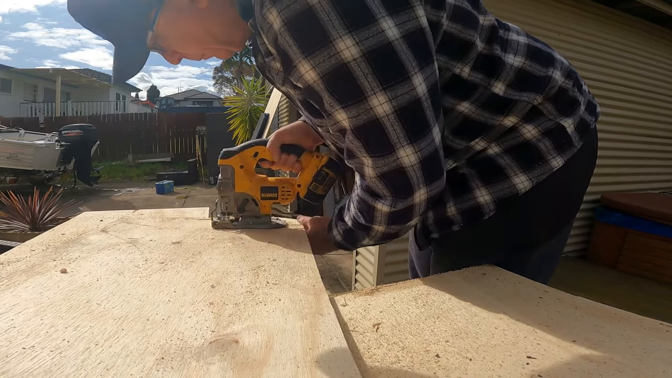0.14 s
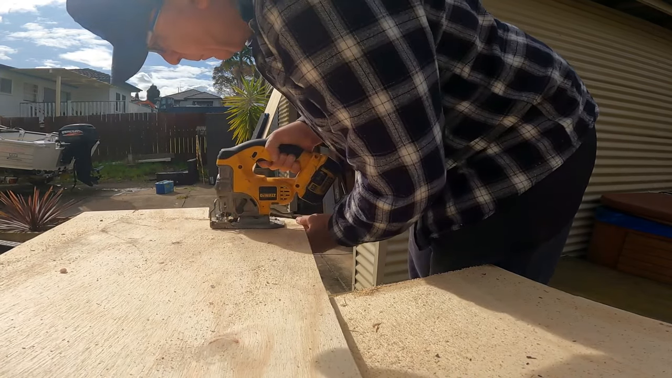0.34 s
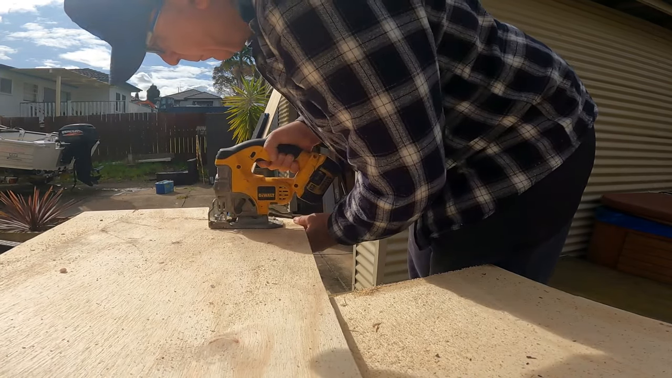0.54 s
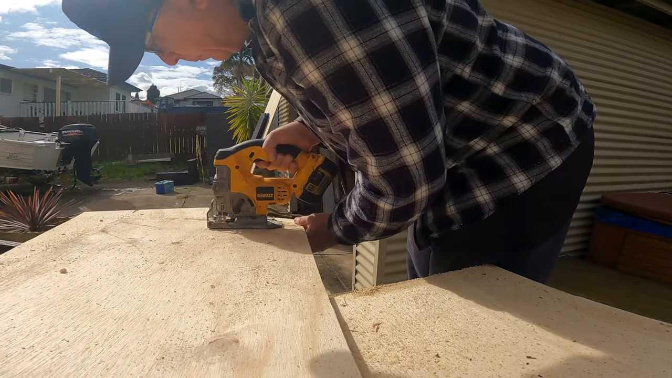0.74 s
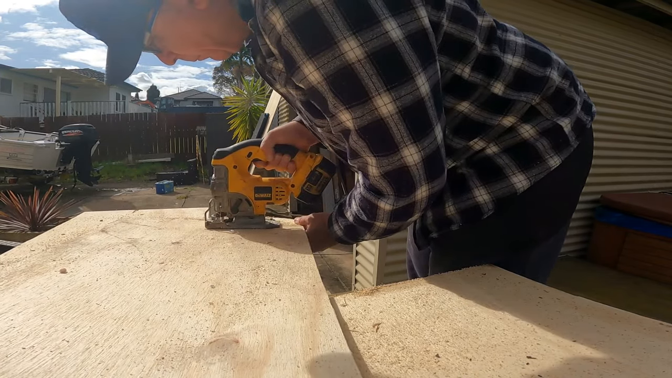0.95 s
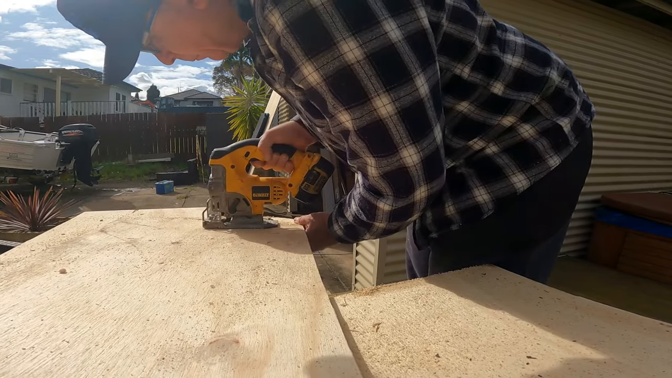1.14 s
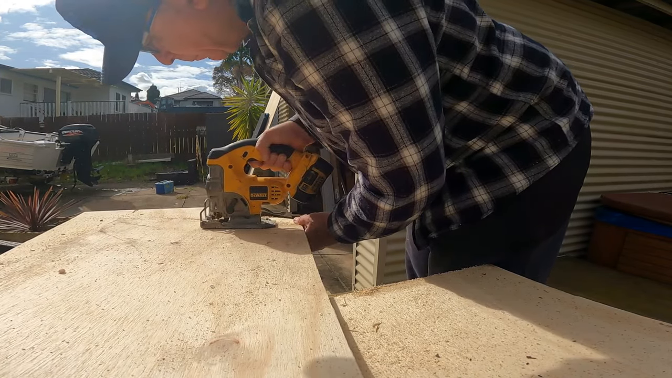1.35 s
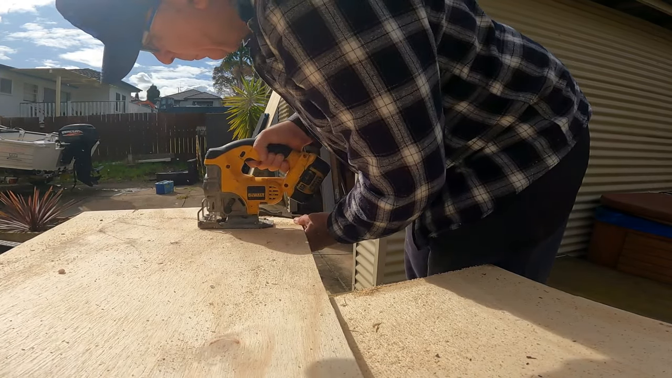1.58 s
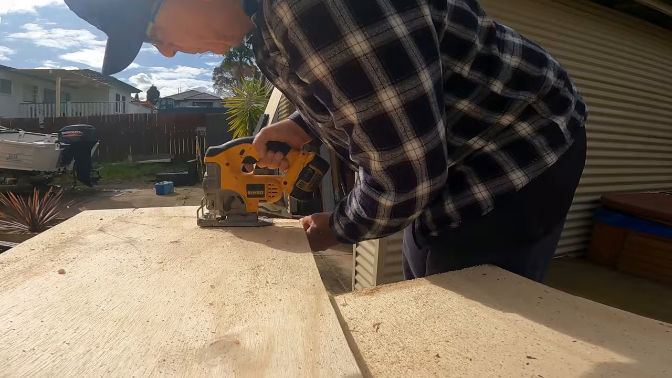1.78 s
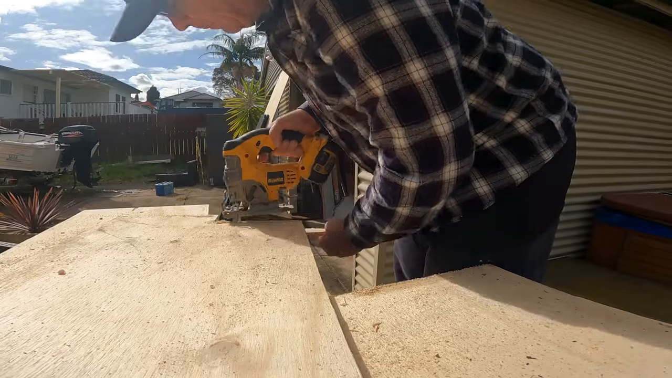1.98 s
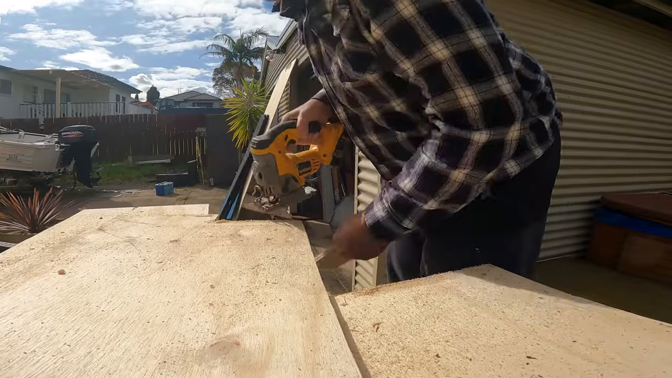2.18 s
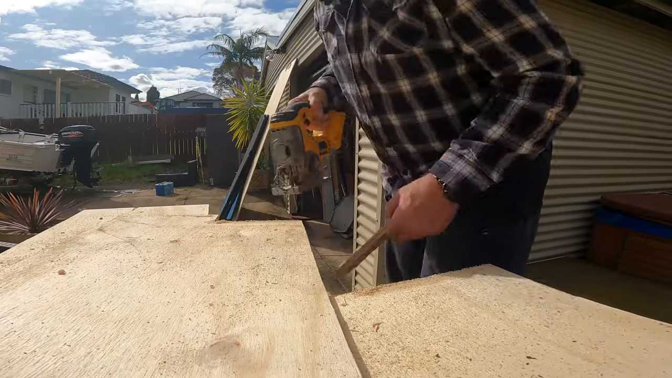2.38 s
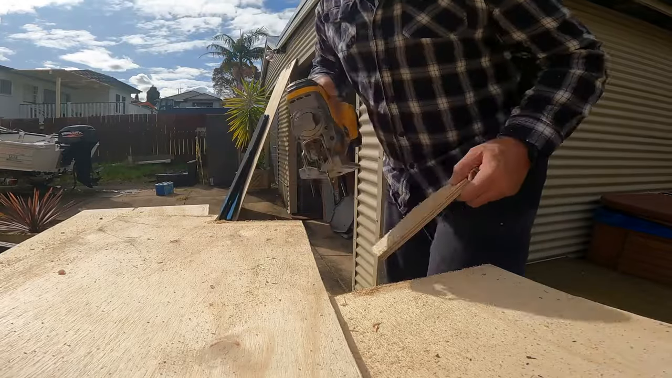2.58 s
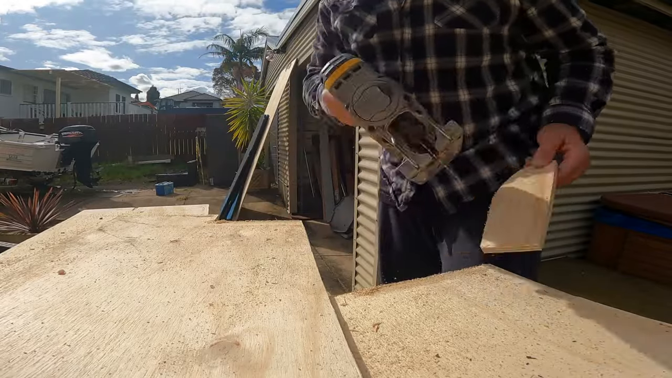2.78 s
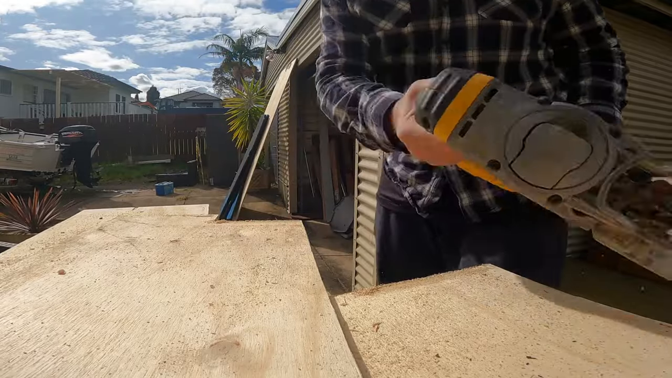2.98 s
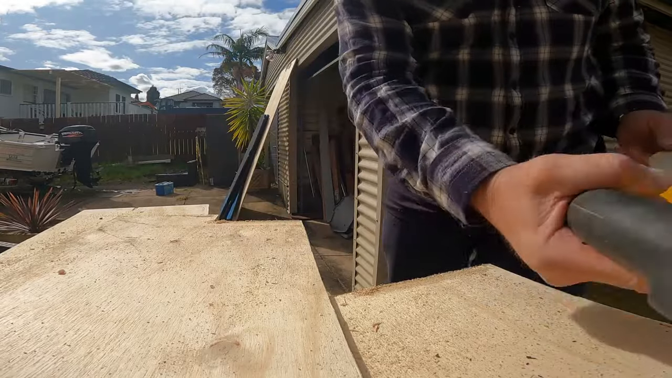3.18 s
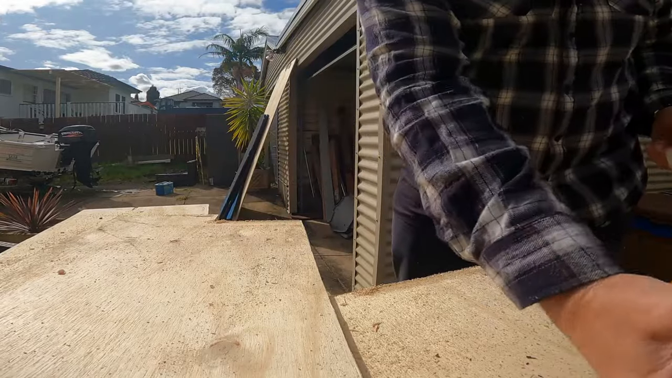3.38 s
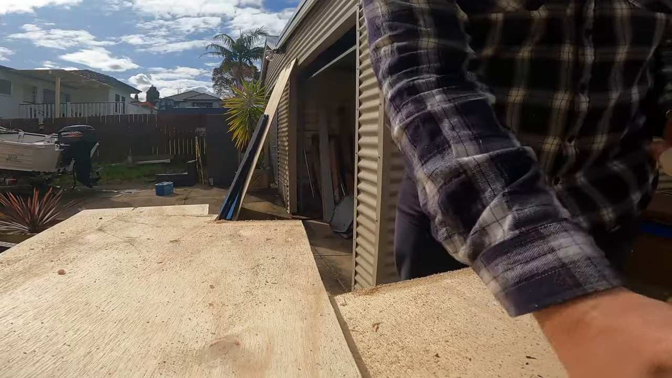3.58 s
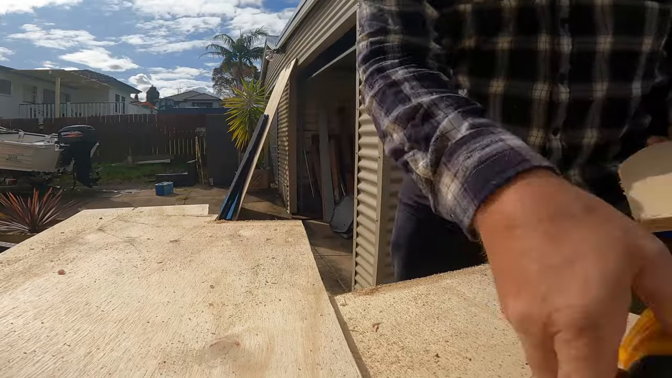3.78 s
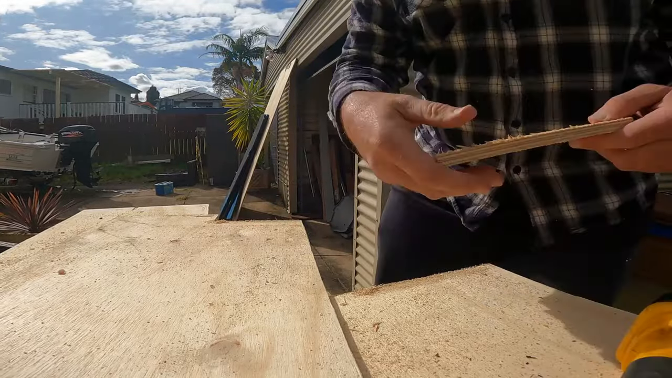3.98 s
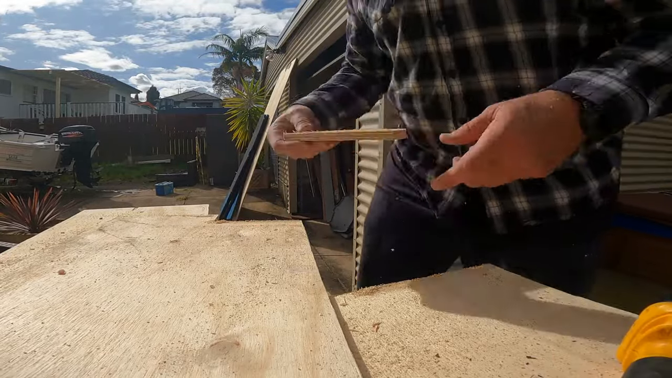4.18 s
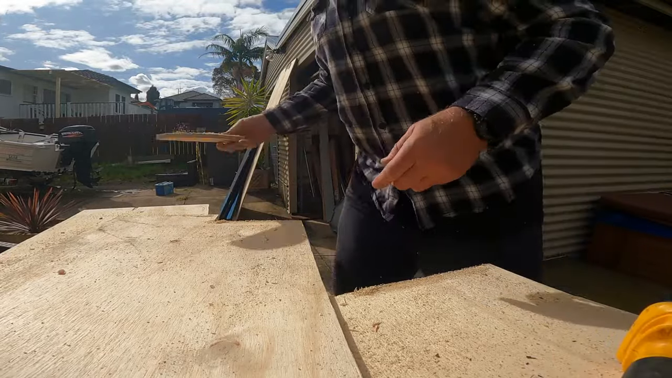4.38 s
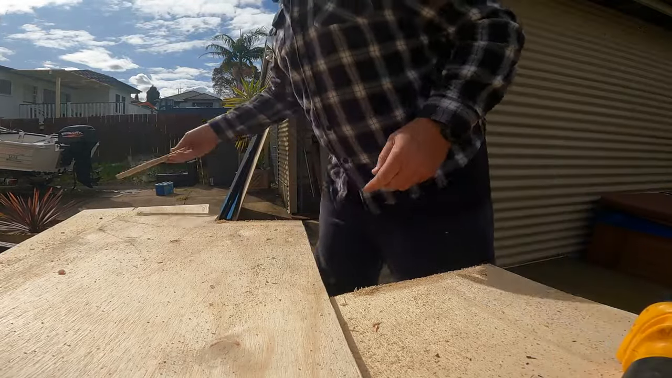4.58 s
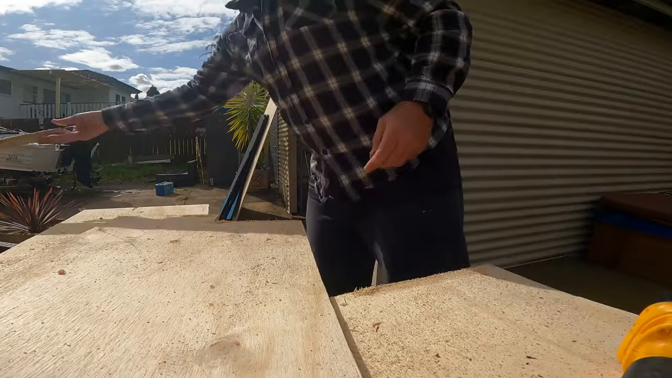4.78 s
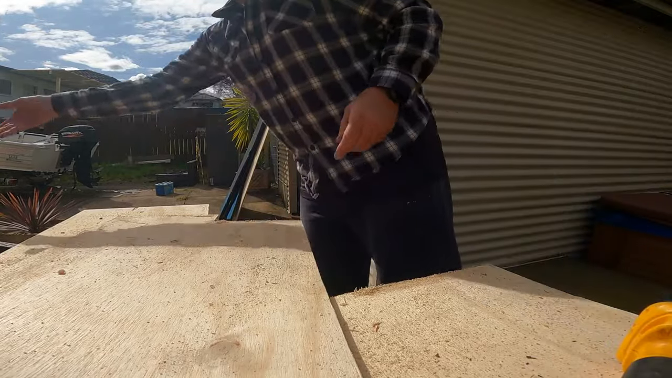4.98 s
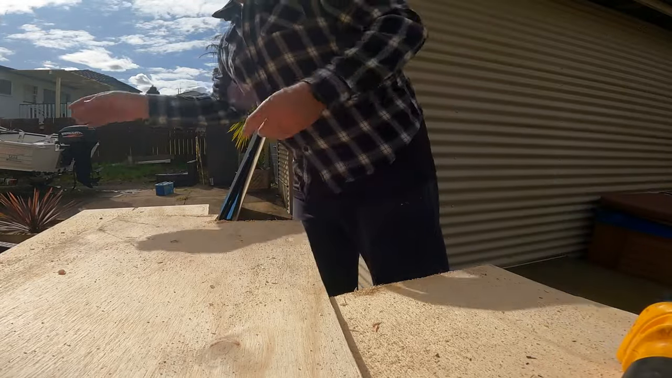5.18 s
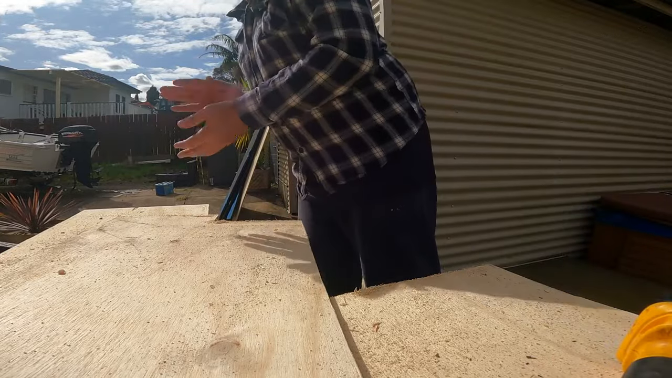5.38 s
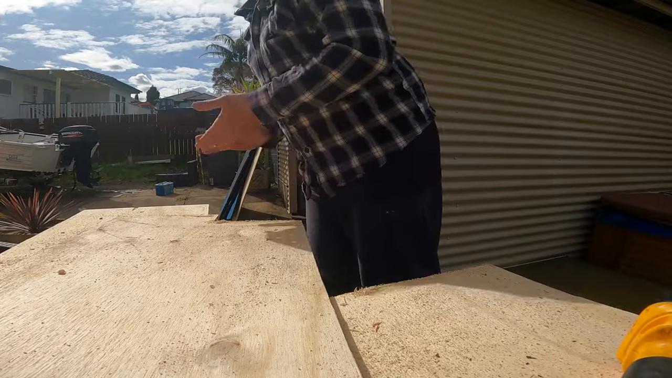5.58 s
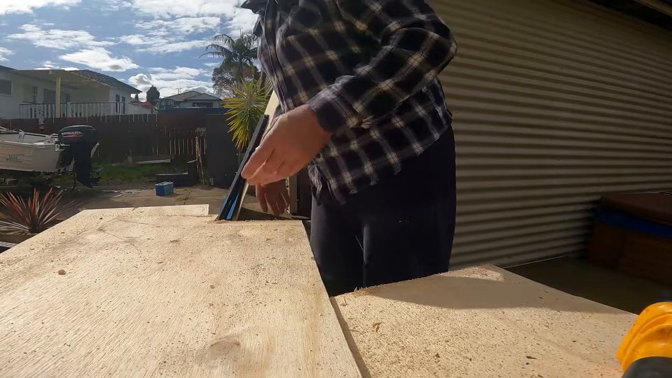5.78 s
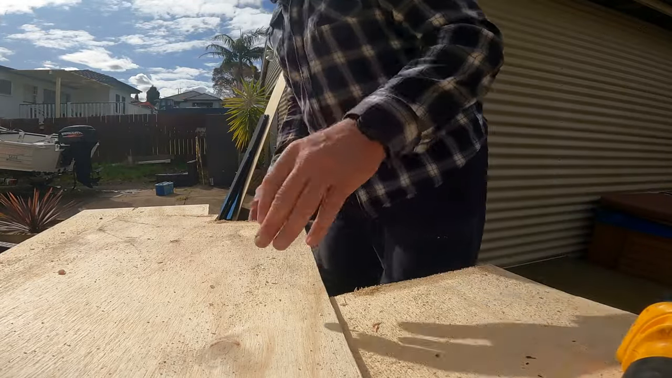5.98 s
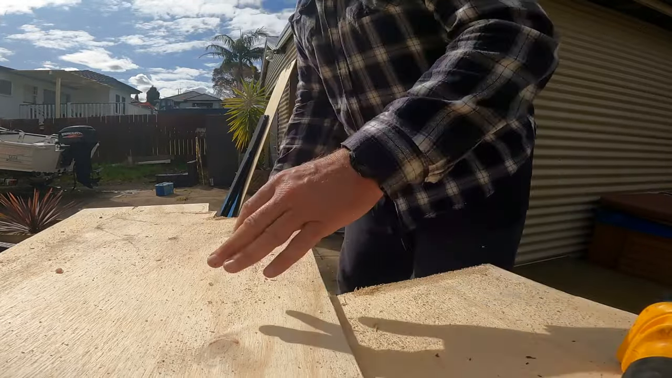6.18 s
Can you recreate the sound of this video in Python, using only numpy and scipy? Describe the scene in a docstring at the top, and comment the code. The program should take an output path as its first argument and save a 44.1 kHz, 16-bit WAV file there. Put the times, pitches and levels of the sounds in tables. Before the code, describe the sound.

An electric jigsaw cuts wood and brakes, followed by deep knocks, sleeve rustle and a tossed scrap of wood landing in a yard.

```python
"""A jigsaw rasps through a plywood sheet, about 46 strokes a second, and brakes to a halt.
The saw is put down on the sheet and rocks, and the offcut is tossed onto a pile. Hands and sleeves
rustle, two birds call far off and distant traffic hums in a yard with a short echo from a tin shed.
The microphone stands on the sheet, so knocks reach it as deep thuds."""
import sys
import numpy as np
from scipy import signal
from scipy.fft import rfft, irfft, next_fast_len
from scipy.io import wavfile
from scipy.ndimage import map_coordinates

SR = 44100
rng = np.random.default_rng(int(sys.argv[2]) if len(sys.argv) > 2 else 0)


def master(y):
    """Save y as 16-bit WAV."""
    cut = np.clip(np.atleast_2d(y).T, -1, 1)
    pcm = np.round(cut * 32767)  # scale
    wavfile.write(sys.argv[1], SR, pcm.astype(np.int16))


N = 275625
T = np.arange(N) / SR
OUT_S, BRAKE_S = 1.845, 1.9135  # the blade leaves the wood, then the brake bites
COAST_DB_PER_S = 44  # how fast motor and shaking fade once the blade is out
# The crack of hard edges meeting. Each row: pitch in Hz, width in Hz, level in dB.
CRACK_PEAKS = [(2160, 1000, 1), (4900, 1400, -3.5), (6900, 1400, -10)]


def amp(db):
    """Turn decibels into a number to multiply by."""
    return 10 ** (np.asarray(db) / 20)


def unit(x):
    """Scale a sound to an average (rms) strength of 1."""
    return x / np.sqrt(np.mean(x ** 2) + 1e-20)


def after(s):
    """Seconds gone since time s, or 0 before it."""
    return np.clip(T - s, 0, None)


def over_time(points):
    """Join (seconds, value) points into one value per sample."""
    return np.interp(T, *np.transpose(points))


def along(points, hz):
    """Read between (Hz, value) points on a logarithmic pitch scale."""
    pitches, values = np.transpose(points)
    return np.interp(np.log(hz + 1), np.log(pitches + 1), values)


def wobble(rate):
    """A random curve that heads for a new value rate times a second."""
    return map_coordinates(rng.standard_normal(int(N * rate / SR) + 4), [T * rate], order=1)


def grainy(depth_db, rate):
    """Noise whose strength flickers."""
    return rng.standard_normal(N) * amp(depth_db * wobble(rate))


def filtered(x, response):
    """Multiply each frequency in x by response(hz)."""
    size = next_fast_len(N + SR // 2)
    return irfft(rfft(x, size) * response(np.fft.rfftfreq(size, 1 / SR)), size)[..., :N]


def coloured(x, spectrum):
    """Shape noise with (Hz, dB) points and scale it to strength 1."""
    return unit(filtered(x, lambda hz: amp(along(spectrum, hz))))


def resonances(x, peaks, soft_hz=20000):
    """Let x ring a body with (Hz, width in Hz, dB) peaks; treble above soft_hz is dulled."""
    hz = np.fft.rfftfreq(SR // 4, 1 / SR)
    modes = sum((-1) ** k * amp(db) * 1j * hz * width / (pitch ** 2 - hz ** 2 + 1j * hz * width)
                for k, (pitch, width, db) in enumerate(peaks))
    body = irfft(modes / (1 + 1j * hz / soft_hz) ** 2)
    return signal.fftconvolve(x, body / np.abs(body).max())[:N]


def struck(times, levels_db, peaks, rattle, t60, soft_hz):
    """Each contact rings a body with one push and a rattle that fades by 60 dB in t60 seconds."""
    push, t = np.zeros(N + SR // 4), np.arange(SR // 4) / SR
    for s, db in zip(times, levels_db):
        blow = rattle * amp(-60 * t / t60) * rng.standard_normal(len(t))
        blow[0] = -1
        push[round(s * SR):][:len(t)] += amp(db) * blow
    return resonances(push, peaks, soft_hz)  # a soft contact stirs little treble


def yard():
    """Distant traffic and air make a low noise, a little different in each ear; from about 3 s the background
    slowly grows louder."""
    spectrum = [(18, -29.5), (30, -4.5), (92, -6.5), (200, -1), (550, -17.5), (1300, -18.5), (1910, -24),
                (3000, -29.5), (6650, -31.5), (14900, -58)]  # Each row: pitch in Hz, level in dB.
    swell = [(0, -63), (2.85, -64.5), (3.2, -61), (6.25, -52)]  # Each row: time in seconds, level in dB.
    middle, side = amp(over_time(swell)) * coloured(rng.standard_normal((2, N)), spectrum)
    return middle + np.outer([1, -1], 0.4 * side)


def shed_echo(x):
    """Shed and fences throw the sound back; the treble dies first and the two ears hear it differently."""
    fade_times = [(200, 0.38), (2000, 0.36), (10000, 0.099)]  # Each row: pitch in Hz, seconds to fade by 60 dB.
    side_levels = [(60, -22), (700, -22), (2300, -18), (4300, -12), (14000, -5.5)]  # Each row: pitch in Hz, level in dB of the left-right difference.
    hz, t, noise = signal.stft(rng.standard_normal((2, SR // 2)), SR, nperseg=256)
    tail = signal.istft(noise * amp(-60 * t / along(fade_times, hz)[:, None]), SR, nperseg=256)[1]
    delayed = np.pad(x, (300, 0))[None]
    side, middle = signal.fftconvolve(delayed, tail / np.linalg.norm(tail[0]), axes=1)[:, :N]
    side = filtered(side, lambda hz: amp(along(side_levels, hz)))
    return amp(-18.5) * middle + np.outer([1, -1], side)


def bird_call(s, length, db, pitch):
    """One fluttering tone swells and fades; pitch(t) gives its Hz at t seconds into the call."""
    t = np.arange(0, length, 1 / SR)
    flutter = amp(db + 2.5 * wobble(69)[:len(t)])
    swell = np.sin(np.pi * (t / length) ** 0.6)
    tone = flutter * swell * np.sin(2 * np.pi * np.cumsum(pitch(t)) / SR)
    return np.pad(tone, (round(s * SR), N))[:N]


def birds():
    """One bird slides up into clear whistles; the other rasps, its pitch shaken too fast to follow."""
    # Each row: start, length and slide time in seconds, top pitch in Hz, level in dB.
    whistles = [(2.093, 0.25, 0.08, 3130, -67.5), (2.311, .24, 0.083, 3130, -68.5),
                (3.192, 0.23, 0.068, 3170, -65), (3.424, 0.18, .03, 3040, -56)]
    # Each row: start and length in seconds, pitch and its spread in Hz, level in dB.
    rasps = [(2.307, 0.38, 2440, 330, -67.5), (3.072, 0.34, 2140, 242, -66), (3.325, 0.38, 2204, 277, -59),
             (5.733, 0.94, 2600, 186, -60)]
    waver, shaken = 1 + 0.008 * wobble(110), wobble(600)
    song = np.zeros(N)
    for s, length, slide, top, db in whistles:
        glide = lambda t: np.interp(t, [0, slide, slide + .06], [top - 300, top, top - 120])
        song += bird_call(s, length, db, lambda t: glide(t) * waver[round(s * SR):][:len(t)])
    for s, length, hz, spread, db in rasps:
        song += bird_call(s, length, db, lambda t: hz + spread * shaken[:len(t)])
    return song


def handling():
    """Sleeves and hands brush past: cloth rustles and wood slides on wood."""
    moves = [(2.579, 0.044, -71, -65), (2.925, 0.13, -62.5, -54), (3.042, 0.073, -64.5, -72),
             (3.498, 0.14, -60, -49.5), (3.631, 0.15, -58.5, -48.5), (3.731, 0.2, -54, -43),
             (4.19, 0.059, -65.5, -73), (4.441, 0.063, -60.5, -78), (4.455, 0.65, -67, -63.5),
             (4.622, 0.065, -66, -65), (4.749, 0.055, -57, -56.5), (4.805, 0.43, -63, -51),
             (5.253, 0.18, -50.5, -47), (5.549, 0.17, -51.5, -57.5), (5.908, 0.083, -60.5, -55.5),
             (6.114, 0.22, -55, -47)]  # Each row: start and rough length in seconds, cloth and scrape levels in dB.
    cloth_spectrum = [(880, -21), (1500, -36), (2540, -4), (6770, -5.5), (12400, -26.5), (14900, -33)]  # Each row: pitch in Hz, level in dB.
    scrape_spectrum = [(100, 0.5), (300, -2.5), (800, -15.5), (1400, -5.5), (1800, -13), (3000, -15.5),
                       (5000, -42)]  # Each row: pitch in Hz, level in dB.
    strength = np.zeros((2, N + SR))
    for s, length, *levels_db in moves:
        done = np.arange(0, 1.4, 1 / (length * SR))
        shape = np.clip(np.minimum(done / 0.1, (1.4 - done) / 0.76), 0, 1) ** 2  # quick start, slow fade
        strength[:, round(s * SR):][:, :len(done)] += np.outer(amp(levels_db), shape)
    cloth = coloured(grainy(2.0, rate=150), cloth_spectrum) * amp(2.8 * wobble(25))
    scrape = coloured(grainy(2.4, rate=51), scrape_spectrum) * amp(1.3 * wobble(25))
    return strength[0, :N] * cloth + strength[1, :N] * scrape


def sway():
    """Each push sets the sheet swaying on its trestles with a deep rumble that dies away."""
    pushes = [(1.93, -36.5), (3.0, -56), (3.469, -19.5), (3.8, -21.5), (4.02, -30.5), (4.209, -40.5),
              (4.42, -45), (4.85, -48), (5.249, -25), (5.91, -34.5), (6.17, -32)]  # Each row: start in seconds, level in dB.
    rise_s, t60 = 0.024, 0.84
    kicks, t = np.zeros(N), np.arange(SR) / SR
    s, db = np.transpose(pushes)
    kicks[np.round(s * SR).astype(int)] = amp(db)
    swing = signal.fftconvolve(kicks, amp(-60 * t / t60) * (1 - np.exp(-t / rise_s)))[:N]
    return swing * coloured(rng.standard_normal(N), [(15, -9), (30, 14), (55, 8), (90, -6), (200, -65)])


def pats():
    """A palm lands on the wood with a light slap; being soft, it stirs only the board's deep note."""
    hits = [(5.661, -58, -35.5), (5.9154, -42, -35), (6.143, -29, -20)]  # Each row: start in seconds, crack and thud levels in dB.
    board_peaks = [(130, 53, 0)]  # Each row: pitch in Hz, width in Hz, level in dB.
    s, crack_db, thud_db = np.transpose(hits)
    return (struck(s, crack_db, CRACK_PEAKS, rattle=0.14, t60=0.1, soft_hz=8550)
            + struck(s, thud_db, board_peaks, rattle=0.04, t60=0.28, soft_hz=150))


def offcut():
    """The offcut lands, bounces and rings over the thud of the boards it hits."""
    hits = [(5.258, -34, -37, -60, -16), (5.2701, -28.5, -25, -53, -9.5), (5.3304, -31.5, -15.5, -25.5, -8),
            (5.3919, -56, -27.5, -39, -23.5), (5.4986, -76, -38, -60, -23.5)]  # Each row: start in seconds, then crack, clack, ring and thud levels in dB.
    # How the wood rings. Each row: pitch in Hz, width in Hz, level in dB.
    offcut_peaks = [(494, 180, 1.5), (740, 72, -0.5), (935, 88, 2.5), (1400, 330, -9.5), (2780, 77, -15)]
    ring_peaks = [(1750, 31, 0)]  # the offcut's longest-lasting note, stirred by blows on its edge
    pile_peaks = [(74, 12, -11), (124.6, 27, -0.5), (210, 48, -0.5), (289, 35, 0), (351, 85, -5)]
    s, crack_db, clack_db, ring_db, thud_db = np.transpose(hits)
    return (struck(s, crack_db, CRACK_PEAKS, rattle=0.22, t60=0.12, soft_hz=9300)
            + struck(s, clack_db, offcut_peaks, rattle=0.054, t60=0.15, soft_hz=2980)
            + struck(s, ring_db, ring_peaks, rattle=0.03, t60=0.23, soft_hz=3000)
            + struck(s, thud_db, pile_peaks, rattle=0.039, t60=0.28, soft_hz=600))


def knocks():
    """The saw knocks on the sheet: its body and base plate clack and the sheet thuds."""
    hits = [(2.0245, -41, -60, -50), (2.898, -51, -54.5, -72), (2.9487, -45, -46, -64),
            (3.0606, -48, -61, -54), (3.2615, -37, -41.5, -66), (3.35, -45.5, -52, -48),
            (3.3923, -45, -41.5, -45), (3.492, -23.5, -12, -6), (3.5293, -35, -53.5, -14),
            (3.6627, -34.5, -46, -38), (3.6982, -31.5, -33.5, -33), (3.8137, -22.5, -22.5, -7),
            (3.8283, -25, -20, -23), (3.908, -33.5, -21, -7), (3.9664, -33.5, -25.5, -16.5),
            (3.9786, -36, -29.5, -23), (4.0333, -39, -29.5, -11.5), (4.054, -40.5, -32.5, -36),
            (4.0906, -41, -38, -19), (4.1086, -46, -35.5, -29), (4.133, -45.5, -46, -29.5),
            (4.7545, -36.5, -51, -41), (5.573, -35.5, -39.5, -34)]  # Each row: start in seconds, then crack, clack and thud levels in dB.
    # How saw and sheet ring. Each row: pitch in Hz, width in Hz, level in dB.
    saw_peaks = [(518, 91, -2), (983, 770, 2), (1290, 850, 3), (1900, 1600, -15.5)]
    sheet_peaks = [(75.3, 22, 0), (141.6, 74.6, 0), (199, 79.5, 0), (274, 80, -8), (393, 99, -13.5)]
    s, crack_db, clack_db, thud_db = np.transpose(hits)
    return (struck(s, crack_db, CRACK_PEAKS, rattle=0.12, t60=0.087, soft_hz=8500)
            + struck(s, clack_db, saw_peaks, rattle=0.11, t60=0.051, soft_hz=2310)
            + struck(s, thud_db, sheet_peaks, rattle=0.031, t60=0.23, soft_hz=600))


def sheet_shaking(strokes, loose, torn, flap):
    """The sheet follows the strokes with a hum and a rumble, which swing as the tearing offcut flaps."""
    # Each row: multiple of the stroke rate, level in dB with the offcut held, and with it hanging.
    harmonics = [(1, -15.5, -10), (2, -2, -8.5), (3, -2, 1.5), (4, 2.5, -3.5), (5, -9.5, -7), (6, -9, 3),
                 (7, -12, -9.5)]
    hum = np.zeros(N)
    for multiple, held_db, hanging_db in harmonics:
        db = held_db + (hanging_db - held_db) * np.minimum(loose, 1) + 2.7 * wobble(8)
        hum += amp(db) * np.sin(2 * np.pi * (multiple * strokes + rng.uniform()))
    spectrum = [(25, -12), (60, -14), (150, -2), (350, -3), (550, -15), (900, -62.5)]
    rumble = coloured(grainy(2.1, rate=22), spectrum)
    level_db = -34.5 + 7 * flap - 5 * torn - COAST_DB_PER_S * after(OUT_S) - 170 * after(BRAKE_S)
    return amp(level_db) * (unit(hum) + 0.72 * rumble)


def motor(upstroke, downstroke, push_db):
    """Gears, fan and dust rush and the gear case whines, pulsing with the strokes while the blade cuts."""
    spectrum = [(180, -41.5), (300, -10.5), (540, -19), (737, -8.5), (826, -14), (926, -4), (1420, -7),
                (2200, -7), (3420, -20), (9120, -23), (12200, -37), (14900, -59.5)]  # Each row: pitch in Hz, level in dB.
    case_peaks = [(4070, 240, 0.5), (4510, 120, 8.5), (6260, 1400, -5.5), (9000, 84, 0)]  # Each row: pitch in Hz, width in Hz, level in dB.
    gears = grainy(1.5, rate=35) * (1.6 + (T < OUT_S) * (upstroke + 0.12 * downstroke))
    brake_db = np.maximum(-521 * after(BRAKE_S), -21 - 121 * after(BRAKE_S))  # fast drop, slower tail
    level_db = -26 + .9 * push_db - COAST_DB_PER_S * after(OUT_S) + brake_db
    return amp(level_db) * (coloured(gears, spectrum) + .22 * unit(resonances(gears, case_peaks)))


def blade_chatter(strokes):
    """In the fastest part of each upstroke the passing teeth make the blade sing a short, falling note."""
    pitches = [(0, 1795), (.8, 1848), (1.0, 2145), (1.5, 2152), (1.57, 1856), (1.65, 1750), (1.69, 2570),
               (1.74, 2145), (1.81, 2993), (1.85, 2027)]  # Each row: time in seconds, pitch in Hz.
    pitch_luck, level_luck = rng.standard_normal((2, 512))[:, np.floor(strokes + .4).astype(int)]
    past = (strokes + .4) % 1 - .53  # strokes since the middle of the bite
    hz = over_time(pitches) * (1 + .06 * pitch_luck - .5 * past)
    burst = amp(2.5 * level_luck) * np.exp(-.5 * (past / .1) ** 2)
    return unit(burst * np.sin(2 * np.pi * np.cumsum(hz) / SR))


def cutting(strokes, upstroke, downstroke, push_db, loose, torn):
    """Teeth catch on the upstroke and rub on the way back; the wood rings differently as the cut grows."""
    # How sheet and blade ring. Each row: pitch in Hz, width in Hz, level in dB.
    held_peaks = [(910, 67, -12.5), (1423, 53, 0.5), (1797, 167, 7), (2200, 400, -5.5), (2885, 120, -9.5)]
    hanging_peaks = [(724, 91, -8), (964, 53, -5.5), (1099, 160, -8.5), (1703, 130, -4.5), (2104, 175, 3),
                     (2658, 294, -1.5), (2930, 415, -6.5)]
    breaking_peaks = [(830, 100, -4), (954, 83, -2.5), (1550, 240, 1), (2276, 460, -4.5), (2753, 200, 0.5),
                      (3080, 430, -3)]
    # Part of the noise returns every stroke, changing slowly as the blade meets new grain.
    first, second = rng.standard_normal((2, 951))[:, (strokes % 1 * 950).astype(int)]
    pattern = np.cos(np.pi * T) * first + np.sin(np.pi * T) * second
    grit = 0.62 * unit(pattern) + 0.67 * rng.standard_normal(N)
    held = np.maximum(1 - loose, 0)  # a held offcut rubs less and makes the bites louder
    rub = amp(1.2 * push_db - 3 * held) * (0.17 + 0.72 * downstroke)
    teeth = grit * (upstroke + rub)
    rasp = np.zeros(N)
    for stage, peaks in enumerate([held_peaks, hanging_peaks, breaking_peaks]):
        share = np.clip(1 - np.abs(loose - stage), 0, 1)
        rasp += np.sqrt(share) * unit(resonances(teeth, peaks))
    level_db = -24 + .3 * push_db - 3.5 * torn + 2 * held - 305 * after(OUT_S)
    return amp(level_db) * (rasp + amp(-3) * blade_chatter(strokes))


def stroke_pulse(strokes, rise):
    """Once a stroke the teeth catch: a pulse peaks after the fraction rise of a stroke, then fades."""
    age = strokes % 1 / rise
    return age * np.exp(1 - age)


def jigsaw():
    """The blade goes up and down until the offcut hangs by a strip and tears off; then the saw brakes."""
    speeds = [(0, 46.25), (1.0, 46.25), (1.2, 45.8), (1.45, 46.0), (1.6, 46.4), (1.85, 46.2)]  # Each row: time in seconds, strokes per second.
    pushing = [(0, -1), (.84, -1), (.88, -7), (.91, -2), (.96, 2), (1.1, 0.5), (1.5, 0), (1.535, -3),
               (1.62, 2.8), (1.85, 2)]  # Each row: time in seconds, how hard the saw is pushed in dB.
    hanging_s, tear_s, tear_length_s, flap_hz = 1.3, 1.54, .08, 5.6
    push_db = over_time(pushing)
    torn = np.clip(after(tear_s) / tear_length_s, 0, 1)
    flap = torn * np.cos(2 * np.pi * flap_hz * after(tear_s + 0.03))
    loose = np.clip(.1 + T / hanging_s * .8, 0, 1) + .7 * torn + .2 * flap  # 0 held, 1 hanging, 2 breaking
    speed = np.clip(over_time(speeds) - 91 * after(OUT_S) - 260 * after(BRAKE_S), 0, None)
    strokes = np.cumsum(speed) / SR - .14  # a running count
    stroke_number = np.floor(strokes).astype(int) + 1
    bite = amp(1.7 * rng.standard_normal((2, 512)))[:, stroke_number]  # each stroke bites differently
    upstroke = bite[0] * stroke_pulse(strokes, rise=0.089)
    downstroke = bite[1] * stroke_pulse(strokes - 0.57, rise=0.035)
    return (cutting(strokes, upstroke, downstroke, push_db, loose, torn)
            + motor(upstroke, downstroke, push_db) + sheet_shaking(strokes, loose, torn, flap))


def scene():
    """Place each sound between left and right, then add the echo and the yard."""
    # Each pair: a sound, and how many dB louder it is on the left than on the right.
    parts = [(jigsaw(), .8), (knocks() + pats() + sway(), -2.5), (offcut(), 2.2), (handling() + birds(), 1)]
    placed = sum(x * amp([[pan_db / 2], [-pan_db / 2]]) for x, pan_db in parts)
    return placed + shed_echo(placed.mean(axis=0)) + yard()


def record(dry):
    """The microphone's input rounds off peaks, lifts the high treble and passes nothing above top_hz."""
    ceiling, top_hz = .8, 15030
    rounded = dry / (1 + np.abs(dry / ceiling) ** 3.5) ** (1 / 3.5)
    treble = [(11000, 1), (13000, 4.5), (15000, -13.5)]  # Each row: pitch in Hz, gain in dB.
    return filtered(rounded, lambda hz: amp(along(treble, hz)) * (hz < top_hz))


dry = scene()
out = record(dry)
master(out)
```